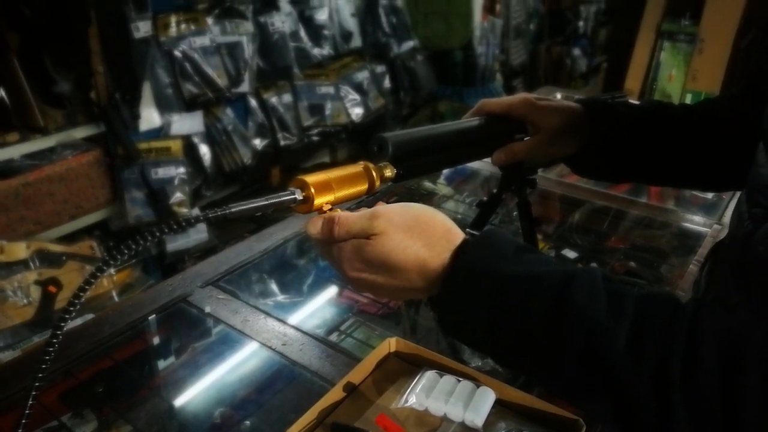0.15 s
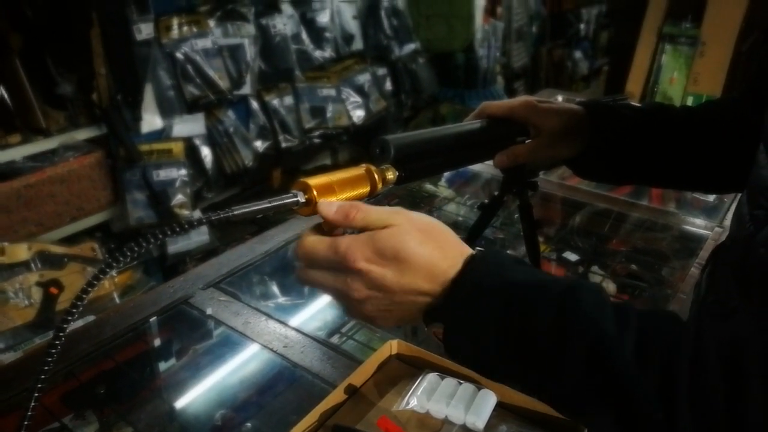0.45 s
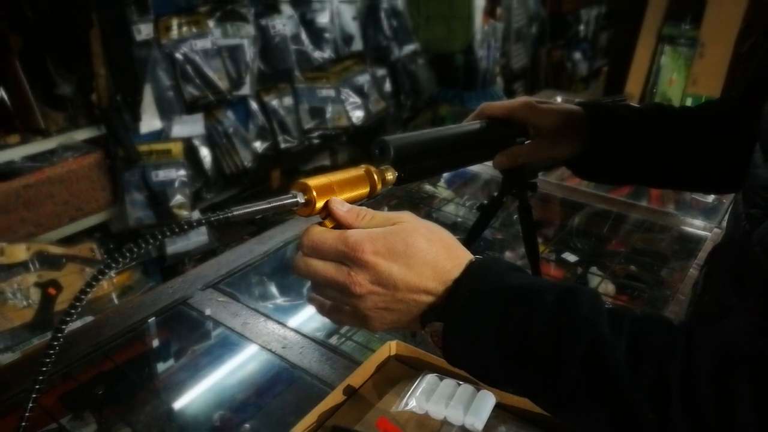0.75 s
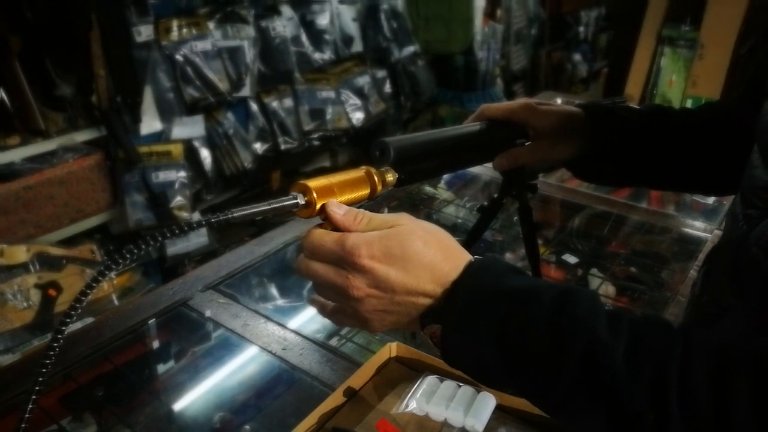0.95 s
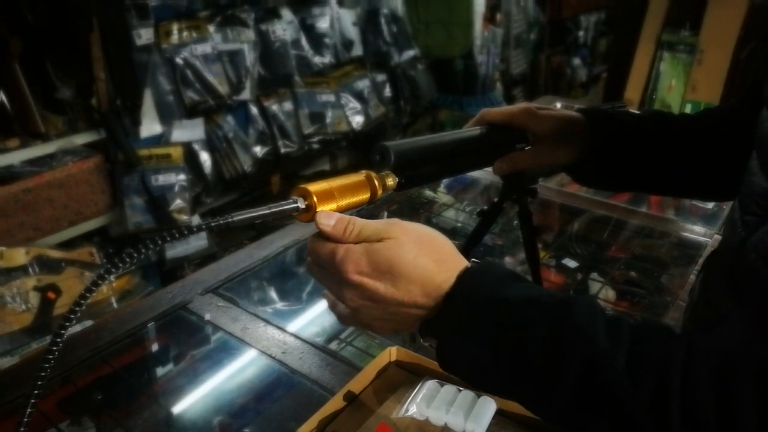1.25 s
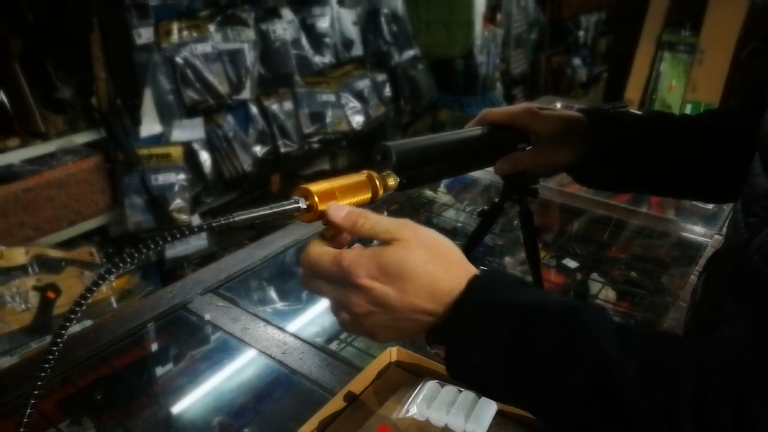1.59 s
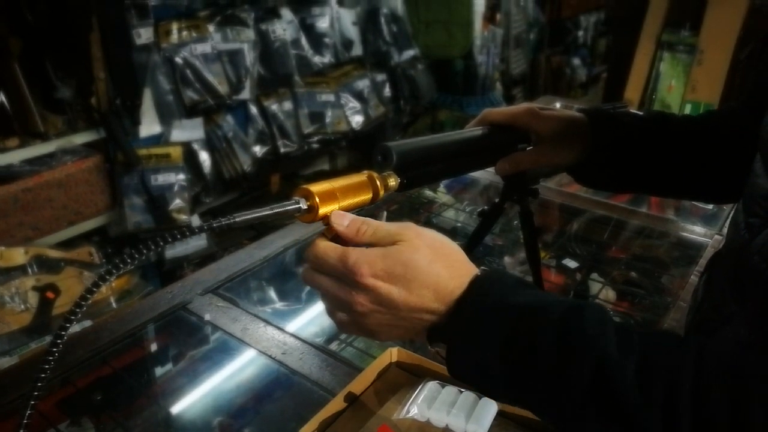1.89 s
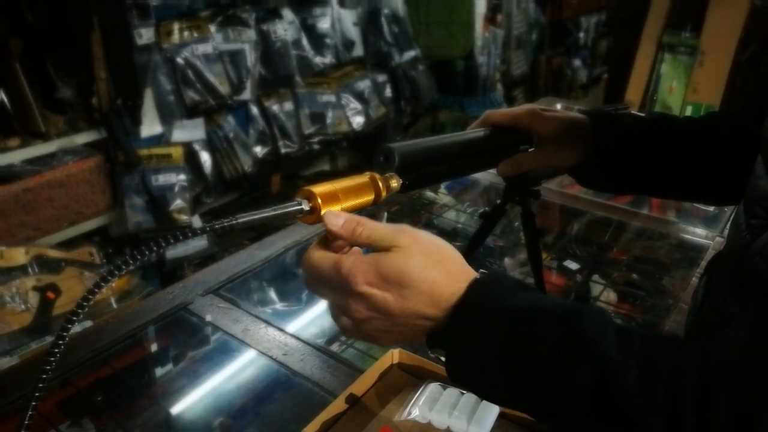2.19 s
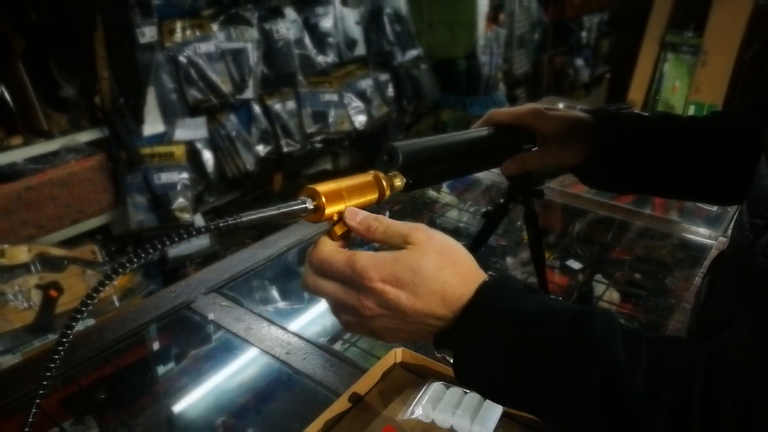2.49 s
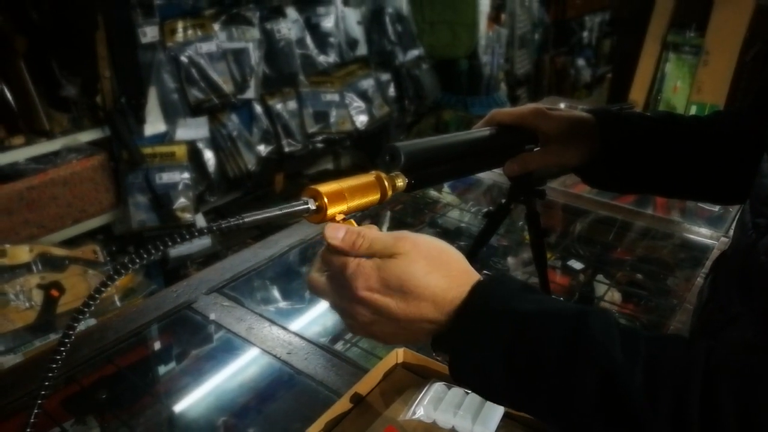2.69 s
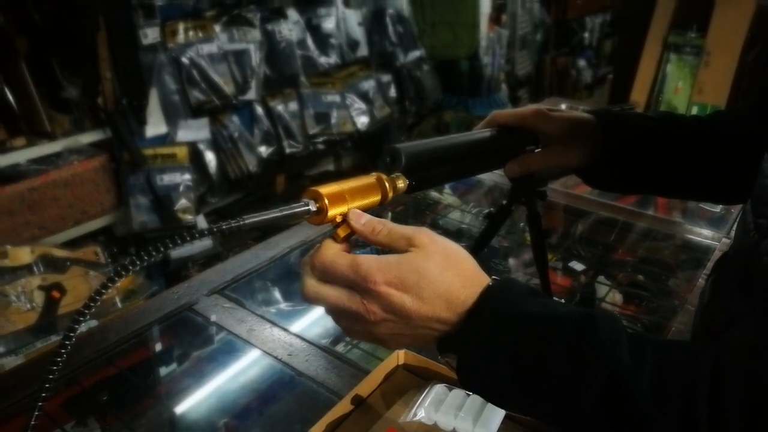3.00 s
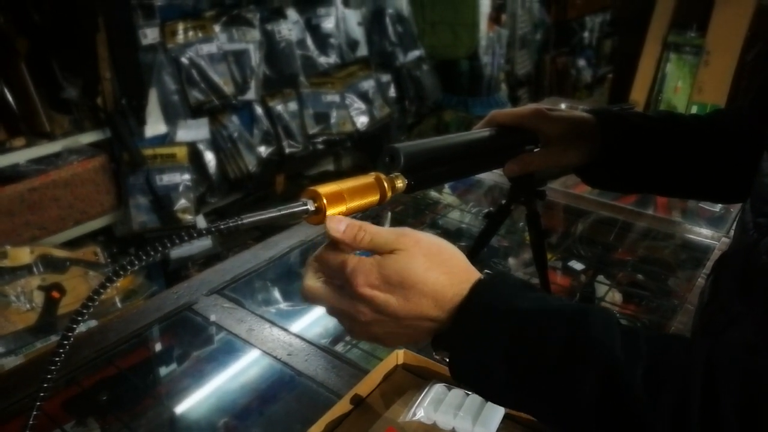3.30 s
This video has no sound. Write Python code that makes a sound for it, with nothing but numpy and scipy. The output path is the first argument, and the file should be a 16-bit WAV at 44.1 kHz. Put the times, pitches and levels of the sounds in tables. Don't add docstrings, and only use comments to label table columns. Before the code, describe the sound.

Loud escaping air blast with harsh distorted crackle, sinking to a thin bright hiss indoors.

```python
import sys
import numpy as np
from scipy import signal
from scipy.io import wavfile
from scipy.ndimage import uniform_filter1d

SR = 44100
rng = np.random.default_rng(int(sys.argv[2]) if len(sys.argv) > 2 else 0)


def wrap_up_sound(samples):
    columns = np.atleast_2d(samples).T
    tamed = np.clip(columns, -1, 1)
    steps = np.round(tamed * 32767).astype(np.int16)
    wavfile.write(sys.argv[1], SR, steps)


def boost_factor(decibels):
    exponent = np.asarray(decibels, float) / 20
    return 10 ** exponent


N = 152145
LEFT_LAG_S = 0.00097


def evened(x):
    return x / np.sqrt(np.mean(x ** 2) + 1e-20)


def read(points, hz):
    f, value = np.transpose(points)
    return np.interp(np.log(hz + 1), np.log(f + 1), value)


def bump(hz, centre, width):
    return np.exp(-(2 * (hz - centre) / width) ** 2)


def span(t, start, length, edge):
    return np.clip(np.minimum(t - start, start + length - t) / edge + .5, 0, 1)


def low(x, hz, order):
    return signal.sosfilt(signal.butter(order, hz, fs=SR, output="sos"), x)


def lag(hz):
    return -2 * np.pi * np.minimum(hz * LEFT_LAG_S, 1)


def pair(size, same, lead):
    frames, hz = 4 * N // size + 5, np.fft.rfftfreq(size, 1 / SR)
    t = np.arange(frames) * size / 4 / SR
    a, b, c, d = rng.standard_normal((4, len(hz), frames))
    alike = np.clip(same(hz), 0, 1)[:, None]
    right = a + 1j * b
    turned = right * np.exp(1j * lead(hz))[:, None]
    left = alike * turned + np.sqrt(1 - alike ** 2) * (c + 1j * d)
    return hz, t, np.array([left, right])


def sound(z, size):
    return signal.istft(z, nperseg=size, noverlap=3 * size // 4)[1][:, :N]


def shop_floor():
    # (frequency [Hz], level per Hz [dB])
    room_colour = [(20, -30), (45, -6), (90, -11.5), (200, -12.5), (320, -15.5), (500, -18), (800, -15),
                   (1200, -19)]
    hz, t, z = pair(size=2048, same=lambda f: 0.82 + 0 * f, lead=lag)
    colour_db = read(room_colour, hz) - 20 * (hz > 1200)
    return boost_factor(-83.5) * evened(sound(z * boost_factor(colour_db)[:, None], size=2048))


def hums():
    # (frequency [Hz], level [dB])
    mains_tones = [(75.4, -93), (301.5, -98)]
    t = np.arange(N) / SR
    phase = np.array([[-1.6], [0]])
    swell = boost_factor(-78) * span(t, start=3.145, length=0.06, edge=0.045)
    short = swell * np.sin(2 * np.pi * 468 * t + phase)
    return short + sum(boost_factor(db) * np.sqrt(2) * np.sin(2 * np.pi * f * t) for f, db in mains_tones)


def skin_rubs():
    # (start [s], length [s], level [dB])
    rub_strokes = [
        (0.237, 0.042, -59),
        (0.334, 0.266, -74),
        (0.675, 0.23, -84),
        (1.365, 0.11, -72.5),
        (1.497, 0.16, -84),
        (2.182, 0.16, -78),
        (2.94, 0.19, -89.5),
    ]
    t = np.arange(N) / SR
    catch_db = 3.5 * evened(uniform_filter1d(rng.standard_normal(N), size=400))
    grit = rng.standard_normal((2, N)) * boost_factor(catch_db)
    late = np.roll(grit[1], round(LEFT_LAG_S * SR))
    grit = np.array([late + .5 * grit[0], grit[1]])
    band = signal.butter(3, (71.6, 496), "band", fs=SR, output="sos")
    rub = evened(signal.sosfilt(band, grit))
    return rub * sum(boost_factor(db) * span(t, start, length, 0.06) for start, length, db in rub_strokes)


def walls(x):
    t60_s, level_db = 0.22, -18
    size = 12000
    t = np.arange(size) / SR
    taps = rng.choice([-1., 1.], (2, size)) * (rng.random((2, size)) < .05)
    taps = taps * boost_factor(-60 * t / t60_s) * (t > .003)
    return x + boost_factor(level_db) * signal.oaconvolve(x, taps / np.linalg.norm(taps[0]), axes=1)[:, :N]


def gate(x):
    # (top of octave [Hz], level [dB])
    shut_octaves = [(670, -14), (1270, -18), (2400, -12)]
    # (start [s], length [s], top of octave [Hz])
    gate_openings = [
        (-.1, .42, 670),
        (.3, .45, 670),
        (-.1, .89, 1270),
        (1.29, .18, 1270),
        (1.69, .11, 1270),
        (2.22, .15, 1270),
        (-.1, 2.65, 1270),
        (2.86, .235, 1270),
        (-.1, 2.65, 2400),
        (2.885, .207, 2400),
    ]
    opening_lifts = [19.5, 1.5, 9.8, 4.6, 6.9, 9.3, 4.64, 12.6, 11.86, 11]
    hz, t, z = signal.stft(x, SR, nperseg=1024, noverlap=768)
    tops = [top for top, db in shut_octaves]
    octave = {top: (hz < top) & (hz >= bottom) for bottom, top in zip([0] + tops, tops)}
    gain_db = sum(db * octave[top][:, None] for top, db in shut_octaves) + 0 * t
    for (start, length, top), db in zip(gate_openings, opening_lifts):
        gain_db = gain_db + db * np.outer(octave[top], span(t, start, length, edge=.03))
    null_db = np.outer([-29, 0], bump(hz, centre=2020, width=110))[:, :, None]
    return sound(z * boost_factor(uniform_filter1d(gain_db, size=3, axis=0) + null_db), size=1024)


def spike_shape():
    tip_s, snap_s, sag_s = .00003, .00022, 0.0027
    t = np.arange(-8, 600) / SR
    tip = np.exp(-(t / tip_s) ** 2 / 2)
    snap, sag = [(t > 3 * tip_s) * np.exp(-t / tau) for tau in (snap_s, sag_s)]
    return tip - (.42 * snap / snap.sum() + 0.23 * sag / sag.sum()) * tip.sum()


def overload():
    # (time [s], peak [dB])
    left_spikes = [
        (.0962, -28),
        (.1173, -16.5),
        (.1229, -26),
        (.1339, -23),
        (.2236, -19),
        (.2392, -26),
        (.2486, -22),
        (.2538, -24),
    ]
    # (time [s], peak [dB])
    right_spikes = [(0.0271, -16.5), (0.0402, -15.0), (0.0411, -8.4), (0.045, -11.2), (0.0683, -17.5),
                    (0.0835, -16.6), (0.0863, -12.8), (0.0889, -10.5), (0.1033, -13.0), (0.1046, -17.5),
                    (0.1143, -15.9), (0.1179, -18.0), (0.1195, -13.7), (0.1209, -18.1), (0.1223, -8.7),
                    (0.1234, -18.0), (0.1255, -11.9), (0.1267, -18.8), (0.1295, -18.6), (0.1328, -8.9),
                    (0.1366, -13.9), (0.1401, -13.2), (0.1447, -11.2), (0.1514, -9.9), (0.1571, -12.3),
                    (0.1665, -16.7), (0.1683, -15.6), (0.1695, -16.0), (0.1761, -11.4), (0.1795, -14.4),
                    (0.1883, -15.4), (0.189, -18.9), (0.1911, -16.2), (0.1985, -18.6), (0.1995, -17.4),
                    (0.2026, -18.1), (0.2046, -14.7), (0.2072, -9.9), (0.2082, -17.0), (0.2102, -19.0),
                    (0.2142, -12.0), (0.2156, -13.4), (0.2216, -14.7), (0.2247, -10.4), (0.2296, -10.0),
                    (0.2304, -17.5), (0.2311, -18.7), (0.2318, -16.4), (0.233, -18.8), (0.2388, -10.1),
                    (0.2429, -17.4), (0.2501, -18.3), (0.2542, -16.5), (0.2588, -9.8), (0.2601, -10.1),
                    (0.2608, -18.7)]
    crackle_per_s, crackle_end_s = 580, 0.346
    happens, size = rng.random((2, 2, N))
    live = np.clip((crackle_end_s - np.arange(N) / SR) / 0.07, 0, 1)
    crackle_db = -24 + np.array([[-11.], [0]])
    train = (happens < crackle_per_s / SR) * live * boost_factor(crackle_db) * size ** 2
    for side, rows in enumerate([left_spikes, right_spikes]):
        for s, db in rows:
            train[side, round(s * SR)] += boost_factor(db + .8)
    near = signal.oaconvolve(train, spike_shape()[None])[:, 8:N + 8]
    dull = boost_factor(-0.5) * low(near, 414, order=1) + boost_factor(-41) * low(near, 740, order=2)
    return near + np.roll(dull[::-1], round(0.00057 * SR), axis=1)


def jet_colour(hz):
    # (frequency [Hz], level [dB])
    left_colour = [(100, -31), (500, -17.5), (1300, -12), (2600, -11), (4000, 1.5), (6500, -1), (13000, -4),
                   (15800, -4.5)]
    # (frequency [Hz], level [dB])
    right_colour = [(300, -19.5), (1300, -6), (2400, 1.5), (5000, -1.5), (6500, -0.5), (10000, -4),
                    (12500, 0.5), (15800, 4)]
    # (frequency [Hz], width [Hz], left level [dB], right level [dB])
    resonances = [(2204, 430, -2, -4), (3975, 880, -6, 6), (4800, 670, -5.5, 6.5), (7800, 1300, 0, 2.5),
                  (8570, 550, 2.5, 0.5), (1566, 140, -4.5, 3.5), (2456, 140, 6.5, -3),
                  (3560, 97, -6.5, 0.5), (1735, 150, -2.5, 0.5)]
    colour = np.array([read(left_colour, hz), read(right_colour, hz)])
    for f, width, left_db, right_db in resonances:
        colour = colour + np.outer([left_db, right_db], bump(hz, f, width))
    return colour


def leak_pressure(hz, t):
    # (time [s], level [dB], lift of the thinnest fizz [dB])
    pressure_steps = [(0, -31, 4), (.07, -31.5, 4), (.13, -29, 5), (.19, -28.5, 4), (.27, -26.5, 6.5),
                      (.32, -29, 4.5), (0.391, -32.5, 3), (.74, -34, 1.5), (.8, -38, 1.5), (1.2, -41, 1),
                      (1.52, -40, 1), (1.58, -40.5, 0), (1.82, -43.5, 0.5), (2.2, -43.5, -1.5),
                      (2.53, -45, -1.5), (2.57, -48.5, 0), (3.1, -49.5, -1.5), (3.45, -48.5, -5.5)]
    s, level_db, fizz_db = np.transpose(pressure_steps)
    thin = 1 / (1 + (8100 / (hz + 1)) ** 10)[:, None]
    return np.interp(t, s, level_db) + thin * np.interp(t, s, fizz_db)


def finger_nudges(hz, t):
    # (start [s], length [s])
    finger_crossings = [(.1, .16), (.41, .36), (.69, .05), (1.285, .075), (1.39, .08), (1.645, .145),
                        (1.69, .05), (2.22, .18), (2.4, .145), (2.875, .215), (3.0, .088), (3.147, .034),
                        (3.095, .04)]
    # (roar level [dB], hiss level [dB])
    crossing_lifts = [(3, 0), (3, 0), (1, 3), (3, 1), (1, 2), (4, 0), (2, 2), (5, 2), (2, 0), (6, 1),
                      (0, 3.5), (1.5, 6), (-1.5, -2.5)]
    roar = 1 / (1 + (hz / 4800) ** 6)[:, None]
    lift = 0
    for (start, length), (roar_db, hiss_db) in zip(finger_crossings, crossing_lifts):
        lift = lift + (roar * roar_db + (1 - roar) * hiss_db) * span(t, start, length, edge=.03)
    return lift


def passing_shades(hz, t):
    # (start [s], length [s], frequency [Hz], left level [dB], right level [dB])
    hiss_glows = [(0, 0.13, 15200, 8, 2), (0.204, 0.22, 8850, 4, 3), (0.206, 0.15, 10900, 4, 3),
                  (.3, 0.62, 13200, -4, 1.5), (0.393, 0.45, 10300, -0.5, -3), (0.425, 0.3, 6400, 3, 3),
                  (0.775, 0.88, 14400, 1.5, 3), (.9, 0.93, 12500, -2, 2.5), (1.203, 0.12, 8650, 2, 4.5),
                  (1.403, 0.16, 15400, 8, -3), (1.55, 0.26, 9900, 1.5, -1), (1.8, 0.74, 15200, 3, 4.5),
                  (1.8, 0.35, 4800, -0.5, 1), (2.0, 0.45, 11900, 0, 3.5), (2.21, 0.1, 3750, 5.5, 2.5),
                  (2.2, 0.23, 8800, 2, 1), (2.553, 0.39, 14600, 5, 4.5), (2.644, 0.27, 6800, 0.5, -5),
                  (2.95, 0.42, 15200, 4, 4.5), (3.1, 0.41, 6530, -0.5, -1.5), (3.25, 0.2, 9800, 0, 0),
                  (1.3, 0.36, 6250, 2, 2), (2.4, 0.18, 6450, -1, -4.5), (1.6, 0.092, 4240, -1, 2)]
    # (start [s], length
    # [s], frequency [Hz], left level [dB], right level [dB])
    roar_shades = [(.2, 0.11, 3760, -3, 6), (.3, 0.66, 2760, 1.5, -3), (.33, 0.5, 566, -8, -0.5),
                   (.45, 0.19, 1750, 3.5, 3.5), (.69, 0.11, 1630, 2, 2), (.78, 0.16, 765, 3, 6),
                   (.85, 0.49, 2380, -3, -4), (1.18, 0.11, 1700, -11, -5.5), (1.29, 0.14, 1250, -1, 3.5),
                   (1.33, 0.048, 1690, -11, -7), (1.46, .15, 1390, -9, -6.5), (1.46, 0.13, 2140, -3, -7),
                   (1.48, .2, 750, 5, 3.5), (1.69, 0.083, 1650, 5, 4.5), (1.86, 0.35, 1670, -7, -6.5),
                   (2.08, .13, 2070, -4, -4), (2.22, 0.11, 2700, 1, 2), (2.27, .27, 1310, 6, 5),
                   (2.3, 0.17, 3380, 2, 3), (2.38, 0.13, 1910, 4, 6.5), (2.54, .035, 1710, 8, 9),
                   (2.57, .29, 1350, 8, 3), (2.57, 0.27, 2650, -11, 0), (2.87, 0.18, 1300, -5, -7),
                   (3.1, 0.44, 1340, 8, 2.5), (3.1, .4, 2020, 3, 2), (3.1, .4, 2650, -7, 0),
                   (3.2, .3, 950, -11, -14)]
    shape = 0
    for rows, width_hz, edge_s in [(hiss_glows, 1700, .05), (roar_shades, 520, .035)]:
        for start, length, f, left_db, right_db in rows:
            glow = np.outer(bump(hz, f, width_hz), span(t, start, length, edge_s))
            shape = shape + np.array([left_db, right_db])[:, None, None] * glow
    return shape


def turbulence(hz, t):
    patches, flicker = rng.standard_normal((2, len(hz), len(t)))
    patches = uniform_filter1d(uniform_filter1d(patches, size=4, axis=0), size=70, axis=1)
    flicker = uniform_filter1d(uniform_filter1d(flicker, size=60, axis=0), size=2, axis=1)
    swell = uniform_filter1d(rng.standard_normal(len(t)), size=16)
    return 1.3 * evened(patches) + 0.47 * evened(flicker) + .4 * evened(swell)


def jet():
    # (frequency [Hz], likeness [0-1])
    likeness = [(300, 0.62), (1400, 0.92), (2600, 0.84), (4000, 0.75), (6500, 0.78), (8500, 0.82),
                (12000, 0.58), (16000, 0.4)]
    # (frequency [Hz], phase [radians])
    left_lead = [(1950, 0.23), (2250, 1.96), (3300, 1.58), (5000, 4.63), (7500, 4.47), (8500, 5.4),
                 (10500, 5.14), (16000, 11.6)]
    hz, t, z = pair(size=512, same=lambda f: read(likeness, f), lead=lambda f: read(left_lead, f) + lag(f))
    colour_db = jet_colour(hz)[:, :, None]
    changes_db = leak_pressure(hz, t) + finger_nudges(hz, t) + passing_shades(hz, t) + turbulence(hz, t)
    unit = np.sqrt(np.mean(sound(z * boost_factor(colour_db), size=512) ** 2))
    return sound(z * boost_factor(colour_db + changes_db), size=512) / unit


def scene():
    air = gate(walls(jet())) + shop_floor() + skin_rubs() + hums()
    side = (air[0] - air[1]) / 2
    side = signal.sosfiltfilt(signal.butter(2, 230, "high", fs=SR, output="sos"), side)
    return air.mean(0) + np.array([side, -side]) + overload()


def low_pass(x):
    return signal.sosfilt(signal.butter(12, 17080, fs=SR, output="sos"), x)


def record(dry):
    edge = signal.firwin(1023, 15800, window=("kaiser", 9), fs=SR)
    mix = signal.oaconvolve(dry, edge[None], "same")
    return low_pass(mix)


dry = scene()
out = record(dry)
wrap_up_sound(out)
```